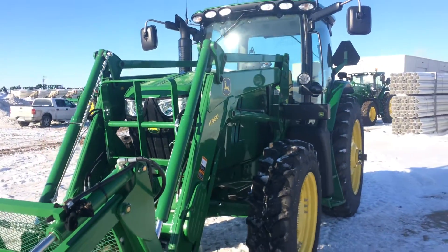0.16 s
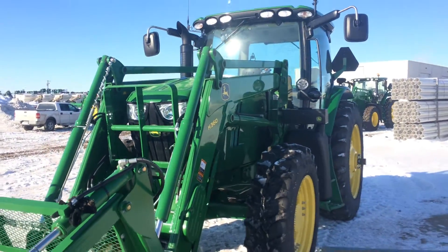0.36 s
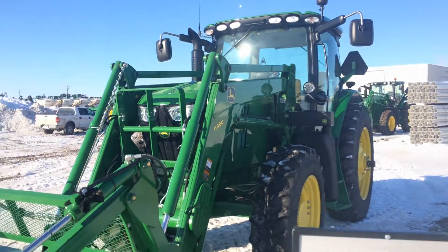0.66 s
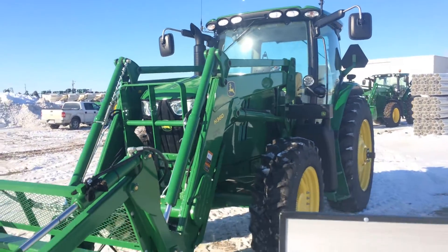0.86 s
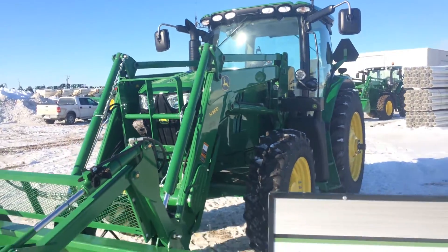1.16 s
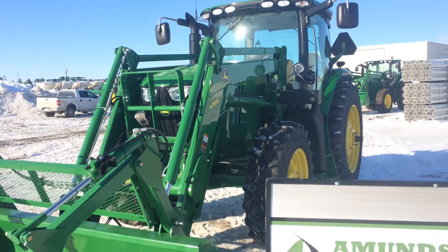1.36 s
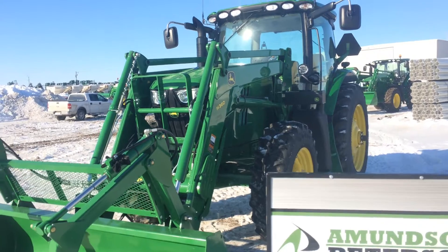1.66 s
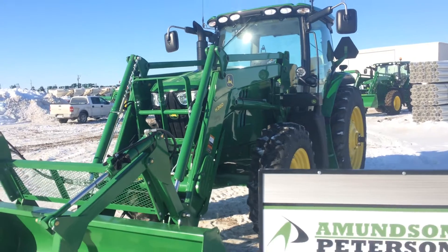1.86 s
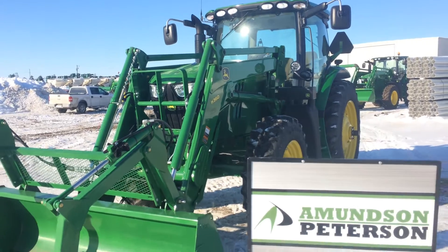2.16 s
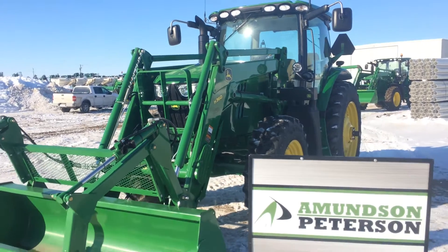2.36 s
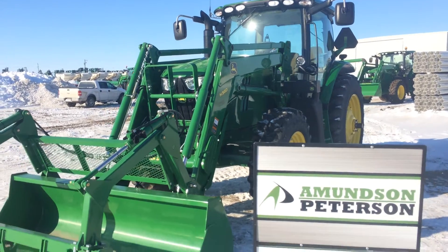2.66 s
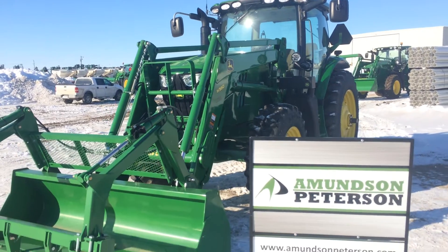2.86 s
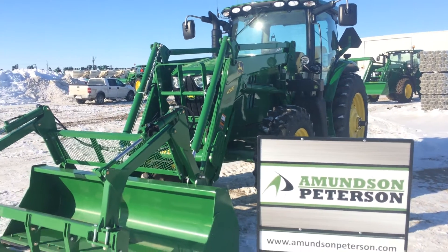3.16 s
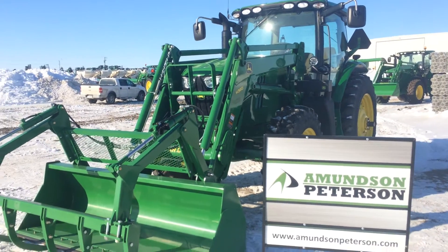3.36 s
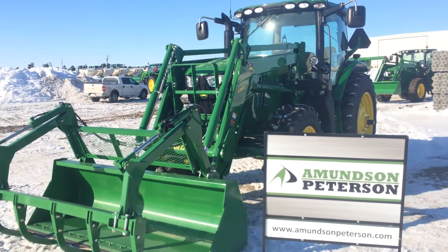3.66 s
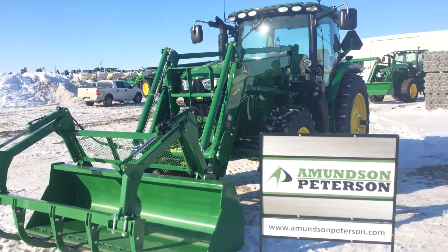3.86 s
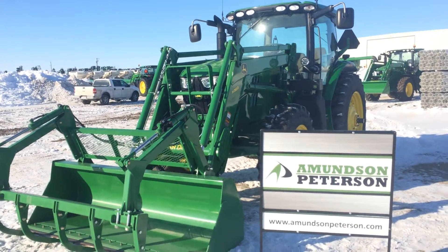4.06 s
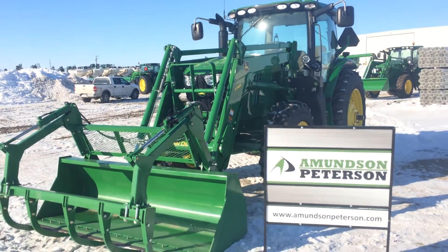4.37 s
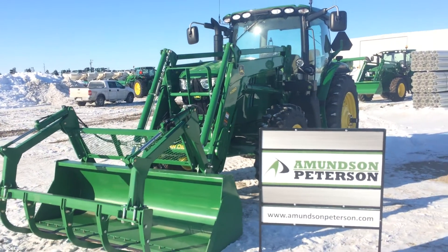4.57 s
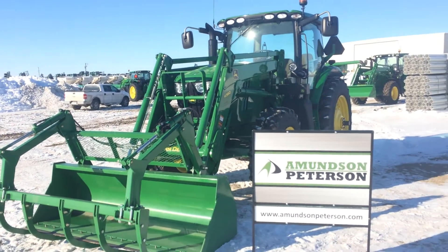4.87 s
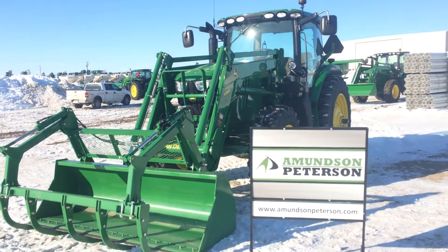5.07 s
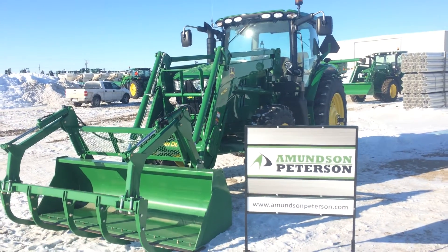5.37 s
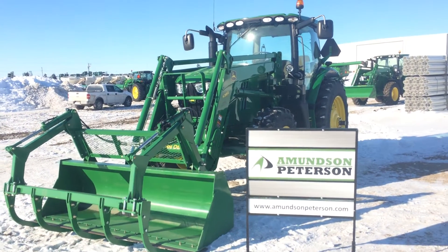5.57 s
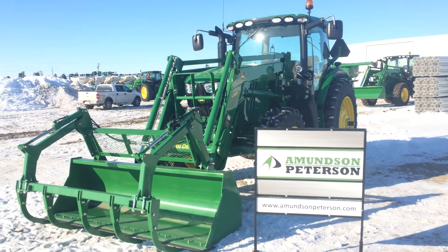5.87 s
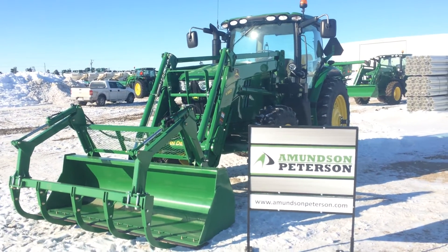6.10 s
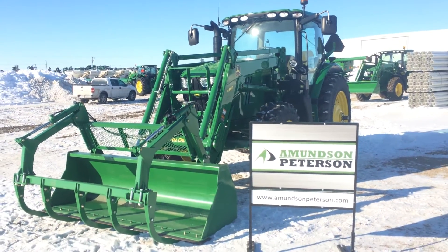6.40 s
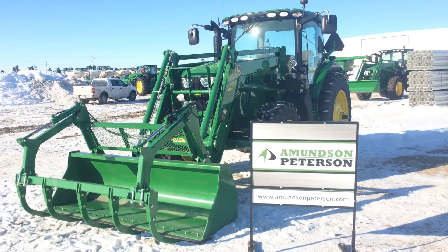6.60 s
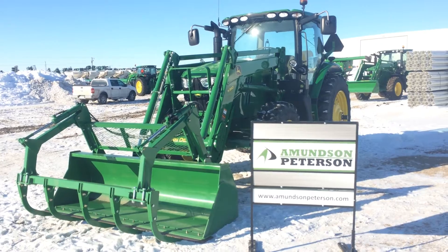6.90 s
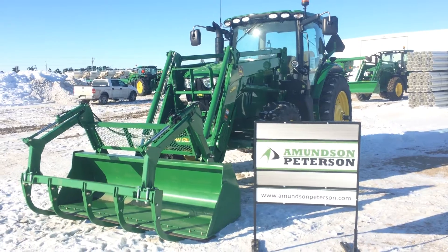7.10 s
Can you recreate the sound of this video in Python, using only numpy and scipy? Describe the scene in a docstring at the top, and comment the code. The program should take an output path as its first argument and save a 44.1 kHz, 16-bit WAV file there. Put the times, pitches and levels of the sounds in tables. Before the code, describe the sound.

A large tractor diesel idles at about 850 rpm in an open, snowy lot, without noticeable echo. Its fast, even clatter has a slightly uneven pattern repeating about seven times a second, with dry mid-pitched knocks, small injector clacks, fan rush, intake sizzle and faint fluttering gear whines. At 0 s a low drone and thin high squeak are present; both fade within the first couple of seconds. The phone backs away until about 4.8 s, so the engine drops to roughly half strength, then stays level. Wind flutters low on the microphone in short gusts, with stronger buffets around 4.5-5 and 6.1 s. A tiny tick clicks at 0.6 s. A deep, dull thump with soft rustle lands at 3.85 s, a smaller double thump at 4.95 s; each briefly pulls everything quieter. Another faint tick comes at 6.9 s, and the idle continues to the abrupt end near 7 s.

```python
"""A six-cylinder tractor diesel idles at about 850 rpm in the open while a phone backs slowly away from it.
Knocks are short rings and clatter is a loop of noise, both repeating every two crank turns.
Gears whine as wavering sine waves; the fan and intake are shaped noise; a drone and a squeak fade early.
Wind flutters on the microphone as noise and short swings, and faint ticks click nearby.
Two dull thumps, slow sine swings with a rustle, make the phone's limiter turn the sound down briefly."""
import sys
import numpy as np
from scipy import signal
from scipy.fft import irfft
from scipy.io import wavfile
from scipy.ndimage import uniform_filter1d, minimum_filter1d, map_coordinates

SR = 44100
rng = np.random.default_rng(int(sys.argv[2]) if len(sys.argv) > 2 else 0)


def file_out(sig):
    """Save sig as 16-bit WAV at sys.argv[1]."""
    # one column per channel
    cols = np.atleast_2d(sig).T
    # limit, then scale
    lim = np.clip(cols, -1, 1)
    pcm = np.round(lim * 32767).astype(np.int16)
    wavfile.write(sys.argv[1], SR, pcm)


N = 319284
T = np.arange(N) / SR  # time of every sample [s]

# Engine levels are relative: ENGINE_DB and the distance scale them all later.
# crank speed: (time [s], speed [rpm])
CRANK_SPEED = [(0, 847.5), (1.2, 849.8), (2.6, 847.5), (4, 849.5), (6, 849.2), (7.2, 851.5)]
# one engine cycle is two crank turns, or 720 degrees
IDLE_RPM, START_DEG, CYCLE_DEG = 849, -49, 720
IDLE_CYCLE_S = 2 * 60 / IDLE_RPM
# distance: the phone backs away steadily, then stands still; engine level at the starting distance
START_M, BACKING_M_S, STOP_S, ENGINE_DB = 3.94, 0.69, 4.8, -34

# colour of the engine block's clatter: (frequency [Hz], relative level per Hz [dB])
BLOCK_COLOUR = [(150, 1.5), (250, -17.5), (340, -4.5), (620, 0), (900, 3.5), (1150, 2), (1520, -1),
                (1720, 0.5), (1950, -8), (2500, -5), (3300, -10), (3950, -14), (4400, -23.5), (4900, -38)]
CLATTER_DB, RUSH_DB = -2.7, -4.7

# combustion knock of each cylinder, in firing order: (ring pitch [Hz], relative level [dB])
CYLINDER_KNOCKS = [(1450, 6), (1380, 1), (1180, 1), (1050, 1), (1100, -0.5), (900, -0.5)]
FIRST_FIRING_DEG, FIRING_RING_MS = 12.47, 3.6
# a bright injector clack comes shortly before each firing
INJECTOR_HZ, INJECTOR_DB, INJECTOR_RING_MS, INJECTOR_LEAD_DEG = 3000, -14.5, 1.8, 15
# valve gear and fuel pump knocks: (crank angle [deg], ring pitch [Hz], relative level [dB])
VALVE_AND_PUMP_KNOCKS = [(20.95, 2450, -2.5), (84.8, 503, 0), (143, 1904, -6), (177, 3014, -6),
                         (240.4, 1700, -3), (290.6, 690, -0.5), (351.6, 2700, -5.5), (393, 637, -1),
                         (457, 964, 2), (470, 3400, -7.5), (600, 2500, -0.5), (706, 1194, 6.5),
                         (712, 2500, -2.5), (718, 1440, 4)]
VALVE_RING_MS = 3.2
# resonances excited by every knock: (multiple of its ring pitch [ratio], relative level [dB])
RESONANCES = [(.68, -9), (.84, -5.5), (1, -4.5), (1.19, -6.5)]
KNOCK_RISE_MS = 1.7
# random scatter of each blow's force (per resonance), timing, and phase (per resonance)
KNOCK_SCATTER_DB, KNOCK_SPREAD_MS, KNOCK_SLIP_RAD = 1.6, .6, .7

# colour of the air rush: (frequency [Hz], relative level per Hz [dB])
AIR_COLOUR = [(100, -14), (250, -6), (500, 0.5), (1000, -2.5), (1700, -6), (2050, -11), (3300, -3),
              (3950, -11), (4400, -19.5), (4850, -22), (5600, -21.5), (9000, -37), (12000, -42.5),
              (15500, -45.5)]
# colour of the airy intake sizzle: (frequency [Hz], relative level per Hz [dB])
INTAKE_COLOUR = [(3400, -7), (3800, -4.5), (4350, 2.5), (4600, -5), (4900, -22), (6000, -55)]
# intake sizzle before its swells: (time [s], relative level [dB])
INTAKE_LEVEL = [(0, -21.5), (3.8, -22), (4.3, -17.5), (4.8, -17.5), (5.5, -21), (6.5, -19), (7.2, -24)]
# whines of gears, belt drive and pumps: (frequency at idle speed [Hz], relative level [dB])
WHINE_PARTIALS = [(425.3, -16.5), (526.5, -15.5), (656.8, -18), (700.5, -28), (737.5, -18.5), (1082, -15.5),
                  (1211, -17.5), (1441, -17.5), (1637, -20), (1717, -17.5), (1933, -23.5), (2631, -29),
                  (2971, -32.5), (3176, -31), (4109, -33), (5507, -39.5), (7865, -49)]
WHINE_FLUTTER_DB, WHINE_WOBBLE_RAD = 5.5, 1.0

# partials of the low drone: (frequency at idle speed [Hz], relative level [dB])
DRONE_PARTIALS = [(106.1, -6), (169.8, 1), (233.5, -22), (254.7, -3), (273, -17)]
# colour of the rumble in the drone: (frequency [Hz], relative level per Hz [dB])
RUMBLE_COLOUR = [(120, -26.0), (170, -2.5), (280, 1.0), (360, -17.0), (900, -64.5)]
# the drone starts stronger, right in front of the tractor, and sinks back with time
DRONE_DB, DRONE_FRONT_DB, DRONE_FADE_S = -51.5, 13.5, 0.81
# a thin squeak around one crank angle, fading as the phone moves away
CHIRP_HZ, CHIRP_DEG, CHIRP_WIDTH_DEG, CHIRP_DB, CHIRP_FADE_S = 8140, 645, 75, -71, 1.7

# gusts on the microphone: (start of full strength [s], length of full strength [s], level before flicker [dB])
WIND_GUSTS = [(0.783, 0.12, -37.5), (0.926, 0.27, -35), (2.083, 0.23, -45.5), (2.604, 0.037, -37),
              (2.807, 0.32, -39.5), (3.498, 0.08, -33), (3.937, 0.35, -42.5), (4.444, 0.16, -33),
              (4.653, 0.455, -36.5), (5.271, 0.11, -38), (5.947, 0.25, -36), (6.334, 0.28, -40),
              (6.87, 0.16, -40)]
GUST_RISE_S, GUST_FALL_S = 0.038, 0.024
# a light breeze drifts beneath the gusts; all of the wind flickers
BREEZE_DB, BREEZE_SWING_DB, FLICKER_DB = -46, 3.5, 2.5
# colour of the wind flutter: (frequency [Hz], relative level per Hz [dB])
FLUTTER_COLOUR = [(20, -22.5), (45, -4.5), (75, 3), (120, 3.5), (190, -3.5), (280, -19), (450, -13),
                  (1000, -45.5)]
# colour of the finer eddies in the wind: (frequency [Hz], relative level per Hz [dB])
EDDY_COLOUR = [(170, -2.5), (300, -0.5), (500, -8), (900, -19)]
# eddies have EDDY_DB when the wind is at EDDY_FROM_DB; growth in dB per dB of wind
EDDY_DB, EDDY_FROM_DB, EDDY_GROWTH = -44.5, -33.5, 1.34

# sharp buffets of wind: (middle [s], peak of the envelope [dB], pitch [Hz])
WIND_BUFFETS = [(.49, -23, 140), (.922, -24, 380), (.94, -24, 131), (1.02, -27, 170), (1.11, -25, 200),
                (1.18, -23, 130), (1.727, -24.5, 170), (2.123, -24.5, 149), (2.833, -24, 150),
                (3.106, -25, 143), (3.285, -25, 130), (3.534, -22, 190), (3.703, -22, 300),
                (4.49, -25, 420), (4.523, -19.5, 340), (4.534, -19, 150), (4.592, -25, 330),
                (4.841, -17.5, 229), (4.853, -23.5, 400), (4.89, -27, 260), (4.970, -14.5, 129),
                (5.148, -19, 130), (5.37, -25.5, 160), (5.66, -24, 129), (5.763, -20.5, 121),
                (5.81, -22.5, 133), (5.968, -24.5, 180), (5.999, -26.5, 220), (6.095, -21, 108),
                (6.106, -19, 500), (6.122, -28.5, 300), (6.172, -22, 110), (6.177, -21, 380),
                (6.946, -22.5, 200), (7.019, -22.5, 169)]
# width of one swing; weaker eddies scatter around it in time and within about an octave
SWING_CYCLES, TRAIN_S, TRAIN_DB, TRAIN_DB_PER_OCTAVE = 0.61, .028, -9, -3

# faint ticks nearby: (time [s], crack level [dB], ring pitch [Hz], ring level [dB])
TICK_EVENTS = [(0.6315, -35, 5300, -33), (6.8842, -35, 1050, -23)]
# colour of the tick's crack: (frequency [Hz], relative level per Hz [dB])
CRACK_COLOUR = [(700, -3), (3300, 2), (5500, -11), (8200, -24), (10000, -48)]

# thumps at the microphone, the later one a double push; levels are before the limiter:
# (time [s], first pitch [Hz], last pitch [Hz], length [s], peak of the envelope [dB], rustle level [dB])
THUMP_PUSHES = [(3.8305, 73.8, 57, .057, 3, -12), (4.919, 86, 86, .022, -3.2, -26),
                (4.9365, 56, 50, .022, -2.5, -27)]
# colour of the thumps' rustle: (frequency [Hz], relative level per Hz [dB])
RUSTLE_COLOUR = [(28, -1), (70, -2), (150, 2.0), (230, -14.5), (400, -24.0), (1200, -38), (4000, -97)]

TOP_HZ = 15250  # upper limit of the phone's sound


def undb(db):
    """Turn decibels into a gain to multiply by."""
    return 10 ** (np.asarray(db) / 20)


def unit(x):
    """Scale a signal to an rms (average strength) of 1."""
    return x / np.sqrt(np.mean(x ** 2))


def curve(rows):
    """Join rows of (time [s], value) by straight lines."""
    return np.interp(T, *np.transpose(rows))


def noise(colour, size=N):
    """Make seamless looping noise of rms 1 by giving shaped frequencies random phases."""
    hz, db = np.transpose(colour)
    f = np.maximum(np.fft.rfftfreq(size, 1 / SR), 1)
    gain = undb(np.interp(np.log(f), np.log(hz), db))
    beyond_ends = np.minimum(np.minimum(f / hz[0], hz[-1] / f), 1) ** 2
    random_phase = np.exp(2j * np.pi * rng.random(len(f)))
    return unit(irfft(gain * beyond_ends * random_phase, size))


def walk(rate):
    """Drift randomly with rms 1: draw `rate` values a second and smooth the steps between them."""
    step = int(SR / rate)
    values = rng.standard_normal(N // step + 1)
    return unit(uniform_filter1d(np.repeat(values, step), step)[:N])


def swell(cycles, times):
    """Swing smoothly between -1 and 1 a given number of times per engine cycle."""
    return np.cos(2 * np.pi * times * cycles)


def tones(cycles, partials, waver_db, wobble=0.39, fade_db=1.2):
    """Sine waves follow the crank speed, each fluttering, wavering in pitch and slowly coming and going."""
    crank_s = cycles * IDLE_CYCLE_S  # a clock that runs faster when the engine does
    out = 0
    for hz, db in partials:
        phase = 2 * np.pi * (hz * crank_s + rng.random()) + wobble * walk(26)
        level_db = db + waver_db * np.tanh(walk(22)) + fade_db * walk(2.025)
        out = out + np.sqrt(2) * undb(level_db) * np.sin(phase)
    return out


def clatter(cycles):
    """Moving parts rattle the block with the same noise every cycle, swelling gently six times, once a firing."""
    size = int(SR * IDLE_CYCLE_S)
    one_cycle = noise(BLOCK_COLOUR, size=size)
    play = 0.00012 * walk(40)  # backlash shifts the blows a little, in cycles
    position = (cycles + play) % 1 * size
    rattle = map_coordinates(one_cycle, [position], order=3, mode="grid-wrap")
    return rattle * undb(CLATTER_DB + 0.5 * swell(cycles, 6) + 0.77 * walk(30))


def knock(cycles, deg, hz, ring_ms, db):
    """A blow at one crank angle rings several resonances, each time with another force, delay and mix."""
    blow_cycles = np.arange(-1, cycles[-1]) + deg / CYCLE_DEG
    starts = np.interp(blow_cycles, cycles, T, left=-1, right=-1)
    starts = starts[starts > 0][:, None]  # one row per blow
    index = (starts * SR).astype(int) + np.arange(-300, 1200)
    ms = (index / SR - starts) * 1000
    age = ms - KNOCK_SPREAD_MS * rng.standard_normal(starts.shape)
    burst = np.exp(-np.where(age < 0, (age / KNOCK_RISE_MS) ** 2, age / ring_ms))
    ring = 0
    for k, (ratio, mode_db) in enumerate(RESONANCES):
        force, slip = rng.standard_normal((2, *starts.shape))
        # k * k starts each resonance at a different phase
        phase = 2 * np.pi * ratio * hz * ms / 1000 + k * k + KNOCK_SLIP_RAD * slip
        ring = ring + undb(db + mode_db + KNOCK_SCATTER_DB * force) * np.sin(phase)
    inside = (index >= 0) & (index < N)
    return np.bincount(index[inside], (burst * ring)[inside], N)


def knocks(cycles):
    """Six cylinders knock in turn, each with an injector clack; valve gear and pump add their own blows."""
    out = 0
    for deg, hz, db in VALVE_AND_PUMP_KNOCKS:
        out = out + knock(cycles, deg, hz, VALVE_RING_MS, db)
    for k, (hz, db) in enumerate(CYLINDER_KNOCKS):
        deg = FIRST_FIRING_DEG + k * CYCLE_DEG / len(CYLINDER_KNOCKS)
        injector_deg = deg - INJECTOR_LEAD_DEG
        out = out + knock(cycles, deg, hz, FIRING_RING_MS, db)
        out = out + knock(cycles, injector_deg, INJECTOR_HZ, INJECTOR_RING_MS, INJECTOR_DB)
    return out


def air_rush(cycles):
    """Fan and combustion noise rush along, swelling at the pace of the firings and crank turns."""
    return noise(AIR_COLOUR) * undb(RUSH_DB + 0.8 * swell(cycles, 6) + 0.54 * swell(cycles, 2))


def intake(cycles, sizzle_deg=340):
    """Intake noise sizzles with swells once a cycle, with the crank turns and firings, and at random."""
    draw = swell(cycles - sizzle_deg / CYCLE_DEG, 1)
    swells_db = 1.4 * draw + 2.1 * swell(cycles, 2) + 1.9 * swell(cycles, 6)
    flicker_db = 4.5 * np.tanh(walk(32))
    return noise(INTAKE_COLOUR) * undb(curve(INTAKE_LEVEL) + swells_db + flicker_db)


def whines(cycles):
    """Gears, belt drive and pumps whine at pitches tied to the crank speed."""
    return tones(cycles, WHINE_PARTIALS, waver_db=WHINE_FLUTTER_DB, wobble=WHINE_WOBBLE_RAD)


def drone(cycles):
    """Low engine partials sound over a fluttering rumble, loudest at the start in front of the tractor."""
    partials = unit(tones(cycles, DRONE_PARTIALS, waver_db=4.5))
    rumble = noise(RUMBLE_COLOUR) * undb(4.2 * np.tanh(walk(45)))
    level_db = DRONE_DB + DRONE_FRONT_DB * np.exp(-T / DRONE_FADE_S)
    return (partials + undb(1.26) * rumble) * undb(level_db)


def chirp(cycles):
    """A thin high tone squeaks once an engine cycle and fades away early on."""
    off_deg = ((cycles - CHIRP_DEG / CYCLE_DEG + .5) % 1 - .5) * CYCLE_DEG  # distance from its crank angle
    gate = np.exp(-(off_deg / CHIRP_WIDTH_DEG) ** 2 - (T / CHIRP_FADE_S) ** 2)
    return gate * tones(cycles, [(CHIRP_HZ, CHIRP_DB)], waver_db=3)


def gust(start, length):
    """A gust's strength rises just before its start, holds, then falls."""
    end = start + length
    return np.interp(T, [start - GUST_RISE_S, start, end, end + GUST_FALL_S], [0, 1, 1, 0])


def wind():
    """Breeze and gusts flutter on the microphone; stronger wind adds more of the finer, higher eddies."""
    breeze = undb(BREEZE_DB + BREEZE_SWING_DB * walk(7.6))
    gusts = sum(undb(db) * gust(start, length) for start, length, db in WIND_GUSTS)
    strength = np.hypot(breeze, gusts) * undb(FLICKER_DB * walk(45))
    eddies = undb(EDDY_DB) * (strength / undb(EDDY_FROM_DB)) ** EDDY_GROWTH
    return noise(FLUTTER_COLOUR) * strength + noise(EDDY_COLOUR) * eddies


def eddy(s, db, hz, phase):
    """One whirl of air passes the microphone as a brief swing of pressure, shorter the higher it is."""
    index = np.clip(int(s * SR) + np.arange(-1000, 1000), 0, N - 1)
    turns = (T[index] - s) * hz
    envelope = undb(db) * np.exp(-(turns / SWING_CYCLES) ** 2)
    return np.bincount(index, envelope * np.sin(2 * np.pi * turns + phase), N)


def buffets(count=4):
    """Each buffet is one strong eddy in a ragged train of weaker ones."""
    out = 0
    for s, db, hz in WIND_BUFFETS:
        out = out + eddy(s, db, hz, 2 * np.pi * rng.random())
        for when, octave, phase in rng.uniform(-1.003, 1, (count, 3)):
            weaker_db = db + TRAIN_DB + TRAIN_DB_PER_OCTAVE * octave
            out = out + eddy(s + TRAIN_S * when, weaker_db, hz * 2 ** octave, np.pi * phase)
    return out


def ticks(crack_s=0.0016, ring_cycles=3.2):
    """Short dry clicks are each a crack of noise and a briefly ringing sine, nearly buried in the engine."""
    out = 0
    noise_crack = noise(CRACK_COLOUR)
    for s, crack_db, hz, ring_db in TICK_EVENTS:
        age = np.maximum(T - s, 0)
        contact = 1 - np.exp(-(age / .0003) ** 2)  # a very quick rise from silence
        crack = undb(crack_db) * np.exp(-age / crack_s) * noise_crack
        ring = undb(ring_db) * np.sin(2 * np.pi * hz * age) * np.exp(-age * hz / ring_cycles)
        out = out + contact * (crack + ring)
    return out


def thumps(rise_s=0.0087, tail_s=0.02):
    """Pushes of air swing the microphone slowly, some sagging in pitch; a rustle swells and trails off."""
    out = 0
    rustle = noise(RUSTLE_COLOUR)
    for s, start_hz, end_hz, length, db, rustle_db in THUMP_PUSHES:
        age = np.clip((T - s) / length, 0, 1)  # 0 at the start of the push, 1 at its end
        phase = 2 * np.pi * length * age * (start_hz + (end_hz - start_hz) * age / 2)
        body = np.sin(np.pi * age ** .7) ** 2
        since = T - s - length / 3  # the rustle peaks a third of the way in
        wake = np.exp(np.minimum(since / rise_s, -since / tail_s))
        out = out + undb(rustle_db) * wake * rustle - undb(db) * body * np.sin(phase)
    return out


def scene():
    """The engine grows fainter in proportion to distance, while wind, ticks and thumps stay close up."""
    cycles = START_DEG / CYCLE_DEG + np.cumsum(curve(CRANK_SPEED)) / (2 * 60 * SR)
    engine = clatter(cycles) + knocks(cycles) + air_rush(cycles) + intake(cycles) + whines(cycles)
    distance_m = START_M + BACKING_M_S * np.minimum(T, STOP_S)
    tractor = engine * undb(ENGINE_DB) * START_M / distance_m + drone(cycles) + chirp(cycles)
    nearby = wind() + buffets() + ticks() + thumps()
    return (tractor + nearby)[None]


def limiter(x, threshold=0.37, ratio=2.7, hold_s=0.288, slew_s=0.0074, release_s=0.023):
    """The gain drops quickly just ahead of a loud peak, is held down for a while, then eases back."""
    hold, slew, release = int(hold_s * SR), int(slew_s * SR), int(release_s * SR)
    allowed = (threshold / np.maximum(np.abs(x), threshold)) ** (1 - 1 / ratio)
    # the origins shift these windows towards the past
    held = minimum_filter1d(allowed, hold + slew, origin=(hold - 1) // 2)
    eased = np.minimum(held, uniform_filter1d(held, release, origin=(release - 1) // 2))
    return x * uniform_filter1d(eased, slew)


def record(dry):
    """The sound fades in and out over 2 ms; the phone limits the peaks and cuts the highest treble."""
    fade = np.minimum(np.minimum(T, T[-1] - T) / .002, 1)
    limited = limiter(dry * fade)
    return signal.sosfilt(signal.ellip(10, .2, 80, TOP_HZ, fs=SR, output="sos"), limited)


dry = scene()
out = record(dry)
file_out(out)
```